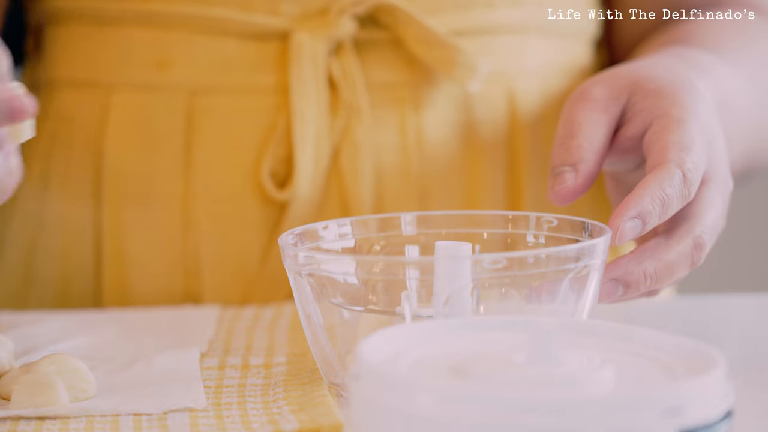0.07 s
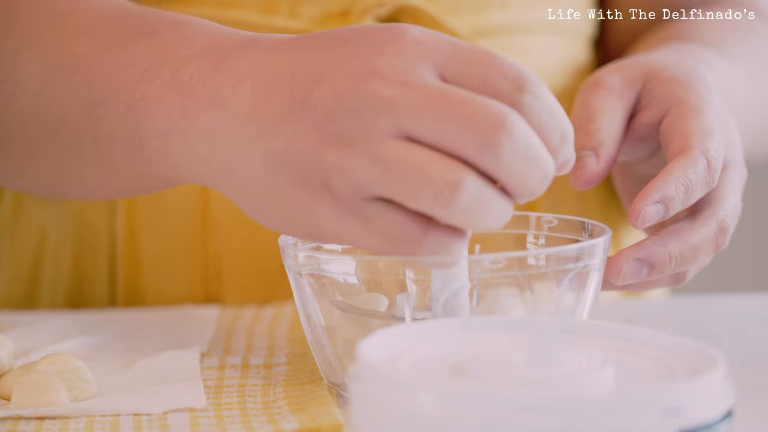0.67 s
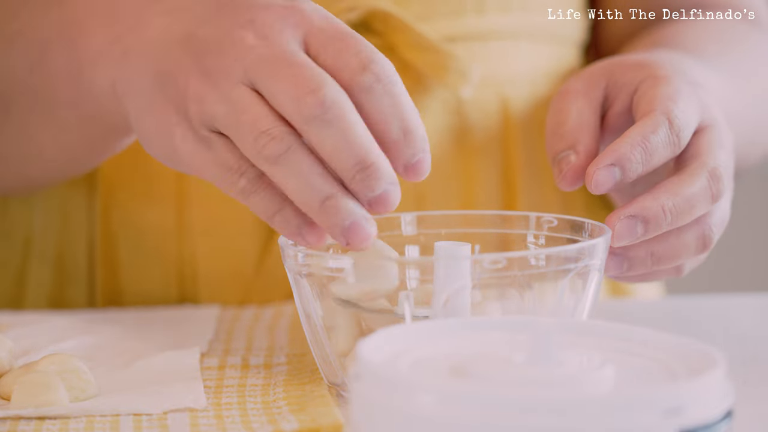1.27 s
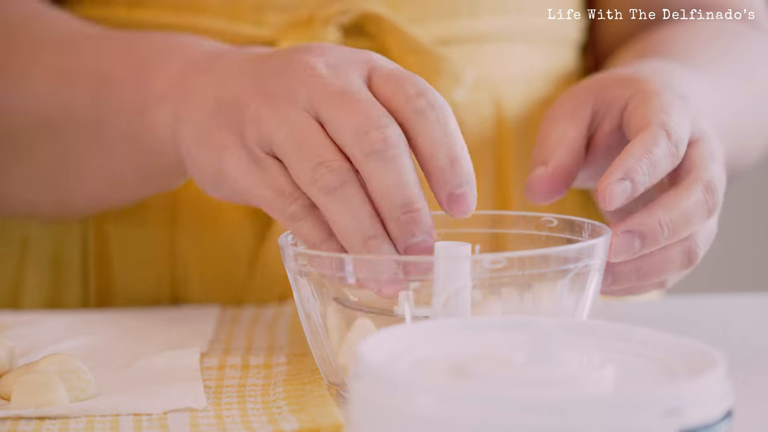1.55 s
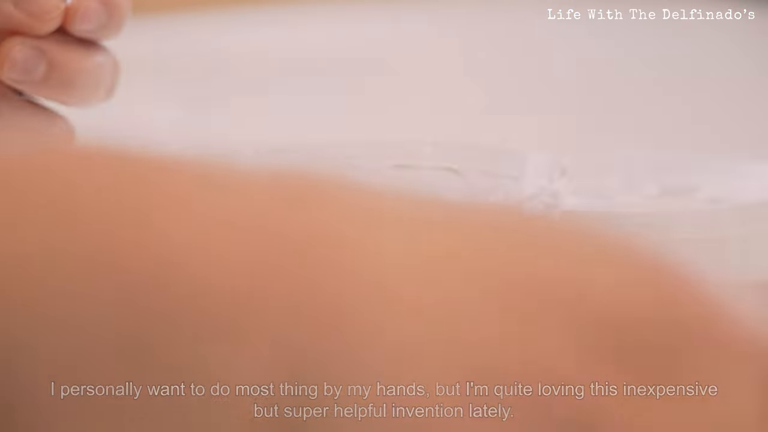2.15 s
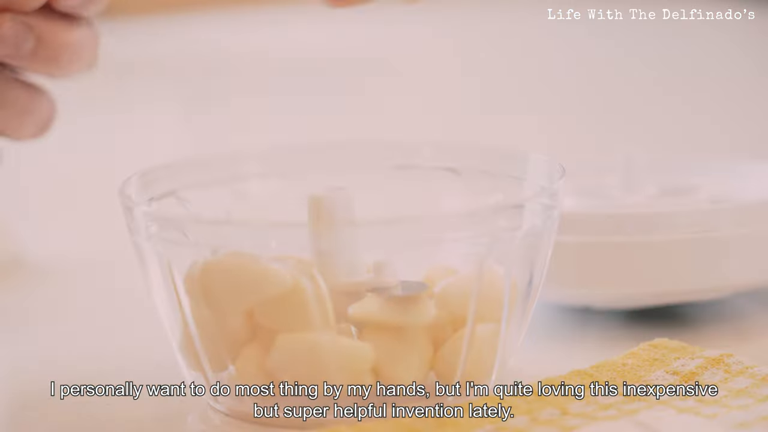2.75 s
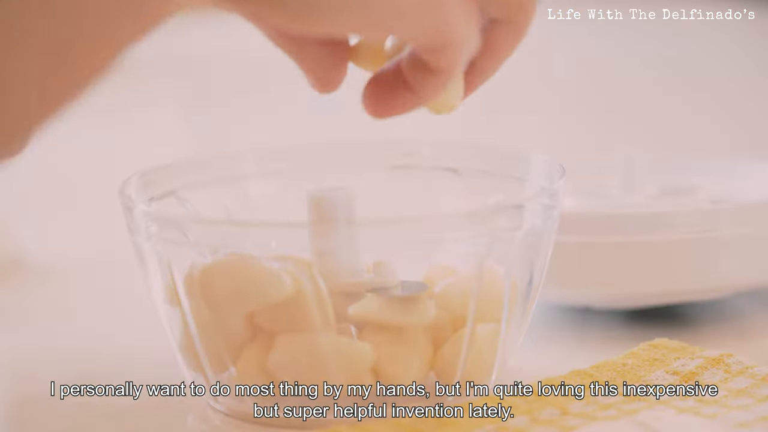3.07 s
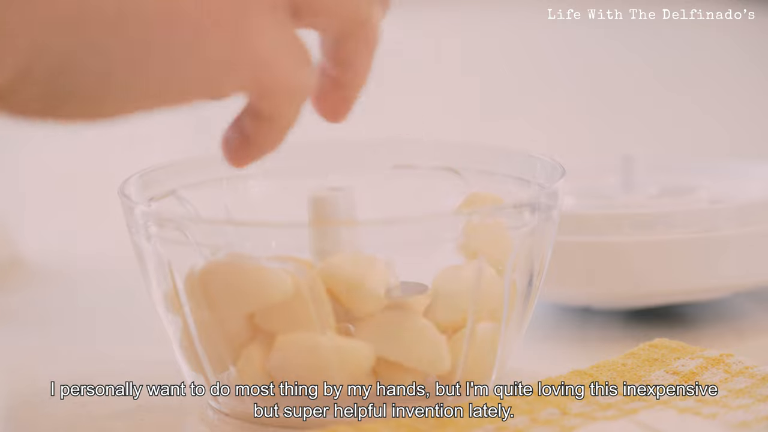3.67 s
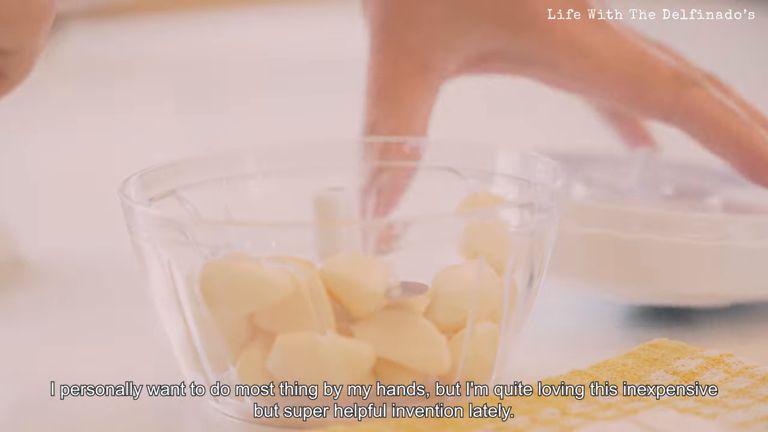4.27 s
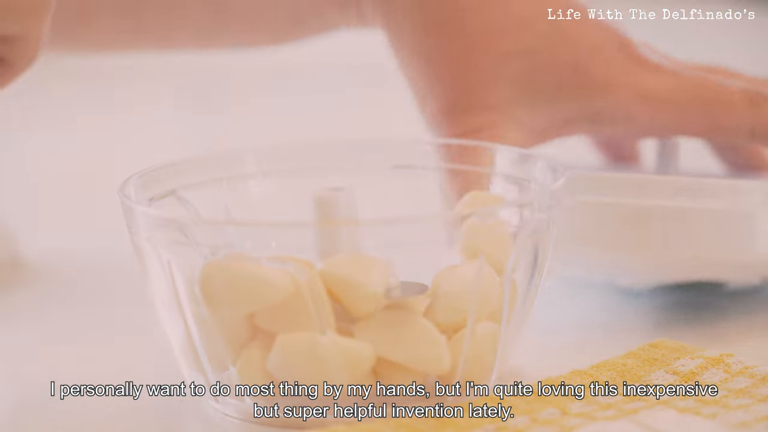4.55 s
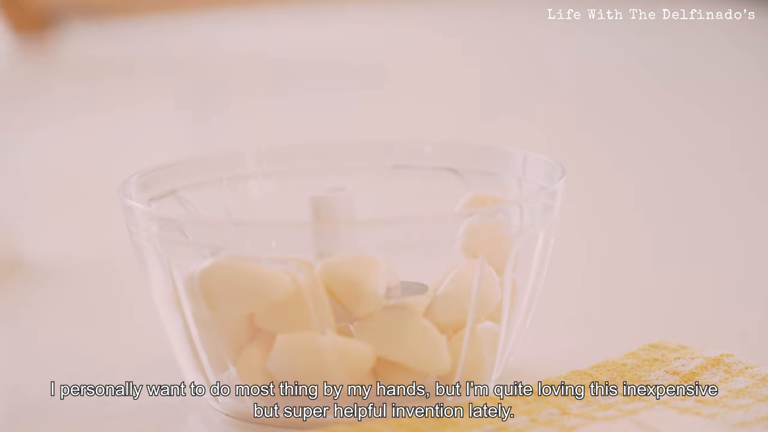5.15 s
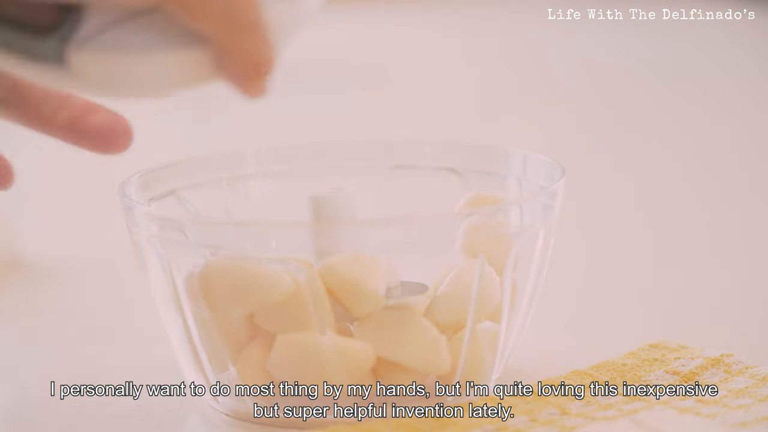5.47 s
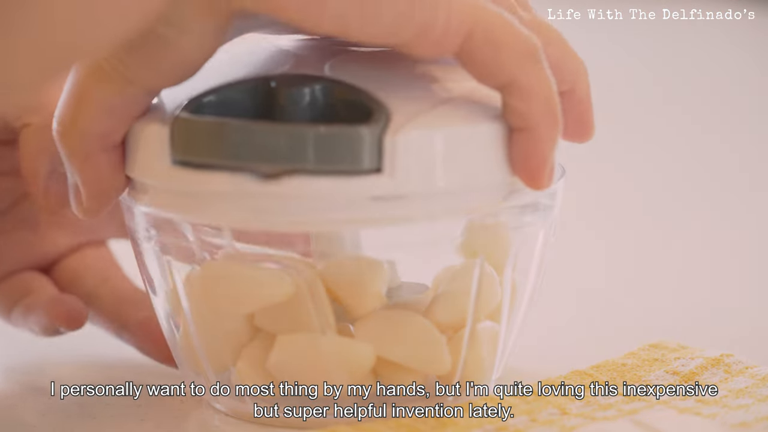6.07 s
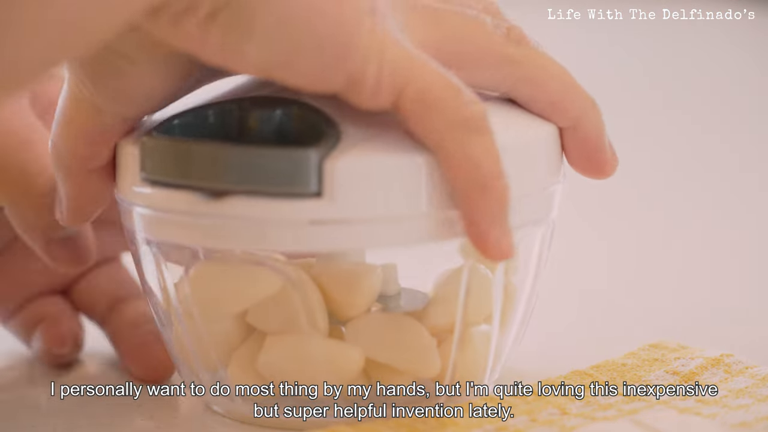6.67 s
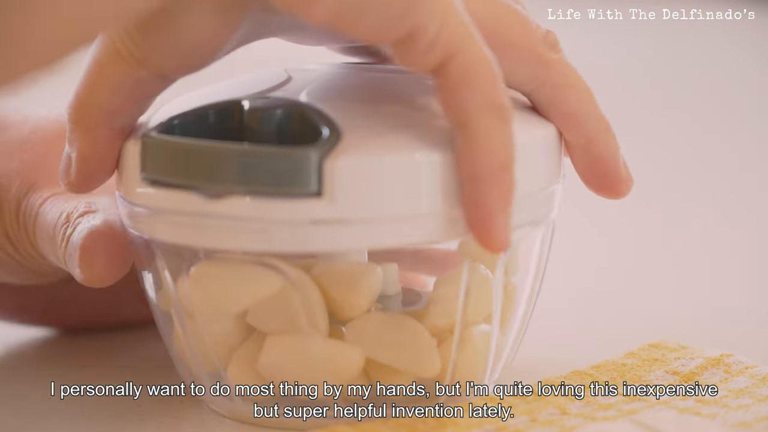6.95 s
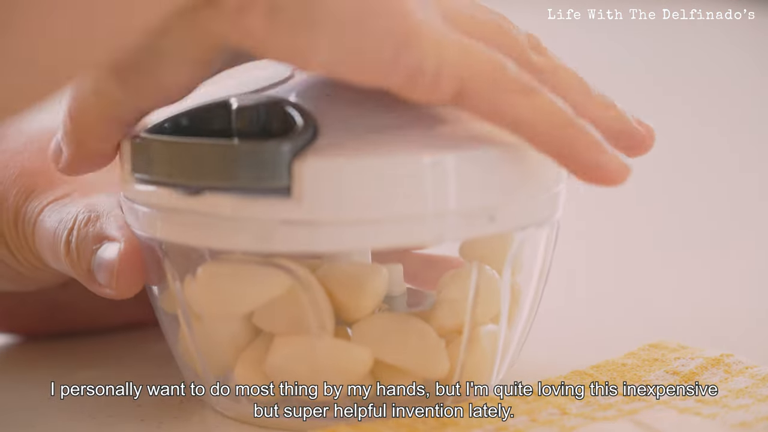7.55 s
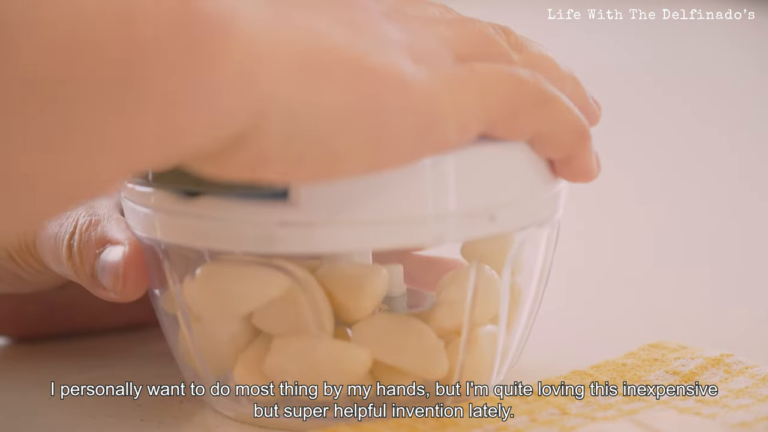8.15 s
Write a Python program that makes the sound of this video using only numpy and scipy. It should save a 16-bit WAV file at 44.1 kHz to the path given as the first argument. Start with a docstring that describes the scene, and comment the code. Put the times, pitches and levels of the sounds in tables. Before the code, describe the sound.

A faint hiss, appliance hum and low rumble run underneath, the rumble dropping at about 2 seconds. From 0.5 to 1.8 seconds, peeled garlic cloves tumble into a hard plastic chopper bowl in a quick, uneven run of hollow knocks, clacks and little rolls, each ringing briefly. A soft brush of fingers follows. Between 3 and 3.8 seconds a few more cloves drop in, quieter and duller. At 4 seconds the plastic lid clicks as it is picked up, with faint rubbing and light bumps until about 5.3. From 5.9 to 6.5 seconds the lid knocks onto the rim several times and settles. At about 7.4 it slides briefly and snaps shut, followed by a few small clicks until just after 8 seconds. Everything sounds close, with the slight, short echo of a small kitchen.

```python
"""Over a faint hum, hiss and rumble, peeled garlic cloves tumble into the plastic bowl of a hand chopper.
Fingers brush the plastic, and a few more cloves drop in. The lid clicks as it is picked up, knocks onto
the rim, settles and snaps shut. Each hit makes the plastic give a short hollow knock, a crack and a
brief ring, which echo in a small, hard kitchen."""
import sys
import numpy as np
from scipy import signal
from scipy.fft import rfft, irfft
from scipy.io import wavfile
from scipy.ndimage import uniform_filter1d

SR = 44100
rng = np.random.default_rng(int(sys.argv[2]) if len(sys.argv) > 2 else 0)


def materialize(psi):
    """Save the field psi as 16-bit PCM at rate SR to the path in sys.argv[1].

    A 1-D psi becomes a single channel; in a 2-D psi each row is a channel.
    """
    bounded = np.clip(np.atleast_2d(psi).T, -1, 1)
    quanta = np.round(bounded * 32767).astype(np.int16)
    wavfile.write(sys.argv[1], SR, quanta)


N = 366912
TIME = np.arange(N) / SR
HIT_TIME = TIME[:SR // 3]

# Levels in the tables are relative: the functions turn them up or down.
# The tone of the steady hiss. Each row: frequency in Hz, level in dB.
HISS_TONE = [(12, -32), (20, -4.5), (70, -0.5), (93, -16), (142, -6), (172, -21), (285, -9.5), (337, -15),
             (718, -14.5), (1370, -20), (2600, -22.5), (3630, -24), (8410, -24.5), (16000, -25.5)]
# The tone of the low rumble. Each row: frequency in Hz, level in dB.
RUMBLE_TONE = [(12, -32.5), (20, 9), (38, -6.5), (100, -1), (161, -5), (189, -1.5), (226, -14), (404, -23),
               (441, -15), (700, -18.5), (910, -58), (1540, -120)]
# Cloves landing in the bowl. Each row: start in seconds, knock level in dB, knock pitch in Hz,
# clack level in dB, tick level in dB.
CLOVE_HITS = [(0.478, -14.5, 570, -27, -46), (0.494, -17, 1110, -24, -41), (0.514, -15.5, 1000, -48, -51),
              (0.529, -27, 790, -34, -27), (0.546, -13, 820, -20, -30.5), (0.562, -15, 796, -38, -39),
              (0.593, -10, 1000, -15, -25), (0.616, -7, 820, -39, -37), (0.642, -6.5, 826, -26, -30.5),
              (0.688, -6, 790, -14, -19.5), (0.704, -7, 1170, -21, -24), (0.737, -4.5, 830, -25, -28.5),
              (0.748, -19, 824, -16, -31), (0.78, -3, 900, -23, -32), (0.792, -10.5, 970, -22, -29.5),
              (0.84, -6.5, 870, -34, -42), (0.884, -9.5, 796, -30, -35.5), (0.946, -6, 820, -33, -37),
              (0.959, -16, 770, -48, -49), (0.981, -15, 780, -48, -42), (1.022, -20, 900, -38, -33),
              (1.03, -9.5, 1010, -21, -31.5), (1.061, -6.5, 1060, -20, -32),
              (1.113, -3.5, 990, -16.5, -24.5), (1.115, -7, 510, -40, -38), (1.151, -13.5, 515, -18, -36),
              (1.18, -6.5, 1000, -28, -33), (1.223, -8.5, 750, -20.5, -32), (1.294, -10.5, 1110, -24, -41),
              (1.329, -11.5, 823, -19.5, -39), (1.39, -7.5, 810, -22.5, -29.5),
              (1.5, -9.5, 1084, -34, -37.5), (1.529, -17.5, 805, -36.5, -38.5),
              (1.65, -12.5, 950, -34, -39.5), (1.713, -11, 816, -41, -48), (1.755, -22, 830, -44, -48),
              (3.048, -17.5, 1280, -24, -34), (3.196, -20, 880, -38, -39), (3.292, -8.5, 1250, -19.5, -22),
              (3.346, -19.5, 820, -28, -45), (3.394, -20, 520, -43, -46), (3.428, -18, 880, -39, -43),
              (3.474, -20.5, 1250, -38, -35), (3.64, -24, 517, -43, -43), (3.668, -23, 1170, -26, -40.5),
              (3.752, -35.5, 600, -45, -55)]
# The notes the open bowl and its blades ring at. Each row: pitch in Hz, level in dB,
# seconds to fade by 60 dB.
BOWL_NOTES = [(503, -4, .33), (590, -12, .2), (788, -10, .25), (839, -9, .28), (943, -7, .35),
              (1013, -9, .25), (1089, -4, .28), (1158, -8, .25), (1310, -7, .33), (1427, -11, .28),
              (2030, -3, .15), (2135, 2, .17), (2330, -3, .17), (2610, -8, .45), (2713, -5, .5),
              (2931, -7, .35), (3920, 7, .04), (4570, 1, .07), (4830, -5, .12), (5530, -4, .1),
              (5900, -1, .12), (6250, 3, .06), (6740, 0, .12), (7150, -5, .1), (9400, -5, .07)]
# Garlic rolling after each drop. Each row: start in seconds, rolling time in seconds,
# then knock, clack and tick levels in dB.
CLOVE_TUMBLES = [(.48, 0.2, -15.5, -17, -37.5), (1.04, 0.18, -19, -19, -31),
                 (3.06, 0.11, -27.5, -39, -37.5), (3.32, 0.12, -32, -36, -37),
                 (3.679, 0.037, -41.5, -41, -36.5)]
# Fingers and lid sliding over plastic. Each row: start in seconds, seconds until it starts to fade,
# rub level in dB, hiss level in dB.
SLIDES = [(2.131, .2, -65, -44.5), (4.436, 0.21, -53, -48), (4.756, 0.043, -46, -57),
          (5.12, 0.23, -53, -47.5), (6.744, 0.09, -61, -50), (7.338, 0.12, -29.5, -32.5),
          (7.67, .08, -56, -46), (8.166, 0.1, -54, -68)]
# The gripped lid being picked up and latched. Each row reads as in CLOVE_HITS.
LID_CLICKS = [(3.975, -19, 1210, -20, -21), (4.079, -35, 930, -31.5, -34), (4.091, -39, 940, -28.5, -29),
              (7.276, -25, 1160, -33.5, -52), (7.32, -29, 1130, -35, -42), (7.387, -8, 1030, -13, -16.5),
              (7.533, -28, 851, -29, -44), (7.58, -33, 920, -24, -44), (7.593, -26.5, 900, -37, -30.5),
              (7.821, -27.5, 1310, -42, -54), (7.834, -28, 1130, -29.5, -38.5),
              (8.106, -41, 1140, -44, -64)]
# The notes the lid rings at. Each row reads as in BOWL_NOTES.
LID_NOTES = [(621, -6, .12), (694, -2, .24), (781, -1, .2), (880, -2, .2), (1024, -3, .18), (1595, 2, .2),
             (1810, 3, .17), (2035, 0, .22), (2659, 0, .25), (2890, 1, .22), (2935, 1, .22), (3890, 2, .07),
             (4511, -3, .1), (6260, -2, .08)]
# The lid bumping as it is moved, then hitting the rim. Each row reads as in CLOVE_HITS.
LID_HITS = [(4.805, -37, 634, -51, -53), (5.171, -30.5, 665, -38, -47), (5.216, -46, 670, -39, -51),
            (5.243, -34, 680, -40, -52), (5.947, -4, 687, -30, -42), (5.951, -7, 940, -18, -25),
            (6.025, -9.5, 840, -29, -51), (6.085, -4.5, 760, -17, -23), (6.155, -12, 750, -28, -41),
            (6.228, -4.5, 657, -15.5, -32.5), (6.269, -11.5, 730, -15.5, -35),
            (6.388, -8, 700, -21.5, -38.5), (6.468, -23, 700, -20.5, -44), (6.484, -35, 895, -29, -40),
            (6.514, -13, 770, -22, -33.5)]
# First echoes off the worktop and wall. Each row: delay in seconds, left strength, right strength.
FIRST_ECHOES = [(.0042, -.05, 0.25), (.0063, 0.21, 0.43), (.0135, .15, .22)]
# The tone of the kitchen's echo. Each row: frequency in Hz, level in dB.
ECHO_TONE = [(100, 3.5), (250, -7.5), (450, 4), (700, -2), (1100, 1), (1600, -2.5), (3000, -1),
             (6000, -3.5), (10000, -1), (16000, 1)]
# How long the echo lasts. Each row: frequency in Hz, seconds to fade by 60 dB.
ECHO_FADE = [(150, 0.47), (500, 0.42), (1200, 0.36), (3000, 0.4), (7000, 0.5), (15000, 0.18)]
# How wide the room sounds. Each row: frequency in Hz, level in dB of what differs between
# left and right against what they share.
ROOM_WIDTH = [(40, -30), (130, -19), (430, -18), (600, -8), (1100, -8), (2200, -1.5), (5000, 1.5),
              (15000, 2)]

HISS_DB, RUMBLE_DB, HUM_DB, HUM_HZ = -45.5, -43.5, -52.5, 61.2
BOWL_FILLS_S = (1.0, 3.7)  # over this time the growing heap of garlic muffles the bowl
LID_SETTLES_S = (6.03, 6.39)  # over this time the rim muffles the lid
KNOCK_FADE_DB_PER_S, SHARP_FADE_DB_PER_S, SETTLE_S = 74, 90, .6  # sharp sounds die before dull ones
SLIDE_RISE_S, SLIDE_FADE_S = 0.041, 0.068
# Over SHIFT_S the rumble drops and the bowl's sound moves from slightly right to the centre.
SHIFT_S, RUMBLE_DROP_DB, BOWL_LEFT_DB = (2.12, 2.24), 10, -2.5


def gain(db):
    """Turn decibels into a number to multiply by."""
    return 10 ** (np.asarray(db) / 20)


def value_at(points, hz):
    """Read between rows of frequency and value, giving each octave equal room."""
    row_hz, value = np.transpose(points)
    return np.interp(np.log(np.maximum(hz, 1)), np.log(row_hz), value)


def ramp(s, start_s, end_s):
    """Rise evenly from 0 to 1 between two times."""
    return np.clip((s - start_s) / max(end_s - start_s, 1e-3), 0, 1)


def level(x, db):
    """Set a sound's average (rms) level."""
    return x * gain(db) / np.sqrt(np.mean(x ** 2))


def burst(x, db):
    """Give a short sound as much energy as 10 ms of steady sound at this level."""
    return x * gain(db) / np.sqrt(np.sum(x ** 2) / (SR / 100))


def band(x, lo_hz, hi_hz, order=2):
    """Keep the sound between two frequencies; a higher order cuts more sharply."""
    edges = [lo_hz, min(hi_hz, SR / 2 - 1000)]
    return signal.sosfilt(signal.butter(order, edges, "band", fs=SR, output="sos"), x)


def add(track, s, sound):
    """Mix a sound in, starting at s seconds."""
    start = max(int(s * SR), 0)
    part = sound[:max(N - start, 0)]
    track[start:start + len(part)] += part


def place(x, left_db):
    """Lean a sound left (or right, if negative), leaving its bass in the middle."""
    upper = band(x, 580, 20000, order=1)
    return x + upper * (gain(np.array([[1], [-1]]) * left_db / 2) - 1)


def room_noise(tone, size):
    """Stereo noise: alike on both sides in the bass, different in the treble."""
    hz = np.fft.rfftfreq(size, 1 / SR)
    shared, side = rfft(rng.standard_normal((2, size))) * gain(value_at(tone, hz))
    side = side * gain(value_at(ROOM_WIDTH, hz))
    return irfft(np.array([shared + side, shared - side]), size)


def background(shift):
    """Steady hiss, a wavering appliance hum and a rumble that drops as shift goes from 0 to 1."""
    waver = level(band(rng.standard_normal(N), 0.62, 4.2), -1.5)
    hum = level(np.sin(2 * np.pi * HUM_HZ * TIME) * (1 + waver), HUM_DB)
    rumble = level(room_noise(RUMBLE_TONE, N), RUMBLE_DB) * gain(-RUMBLE_DROP_DB * shift)
    return level(room_noise(HISS_TONE, N), HISS_DB) + hum + rumble


def knock(hz, cycles):
    """The plastic wall swings harder while it is pushed, then quickly stops."""
    turns = hz * HIT_TIME
    return np.sin(2 * np.pi * turns) * turns * np.exp(-np.minimum(turns / cycles, 50))


def crack(lo_hz, hi_hz, decay_s, order=2):
    """Many crowded notes of the plastic die so fast that they sound like noise."""
    t = HIT_TIME[:SR // 16]
    spectrum = rfft(rng.standard_normal(len(t)) * np.exp(-t / decay_s))
    # so many overlap that the peaks and gaps are shallow
    spectrum = spectrum / np.sqrt(abs(spectrum) + 1e-12)
    sound = irfft(spectrum, len(t)) * np.exp(-t / (2 * decay_s))
    return np.pad(band(sound, lo_hz, hi_hz, order), (0, len(HIT_TIME) - len(t)))


def ring(notes, hit_tone):
    """The plastic rings on; each note's strength depends on the hit's tone and where it lands."""
    hz, db, fade_s = np.transpose(notes)
    spot, detune = rng.standard_normal((2, len(hz)))
    # a note is weak when struck at a spot where it barely moves
    strength = gain(db + value_at(hit_tone, hz)) * np.tanh(2 * spot)
    swing = np.sin(2 * np.pi * np.outer(hz * (1 + .003 * detune), HIT_TIME))
    fade = np.exp(-np.log(1000) * np.outer(1 / fade_s, HIT_TIME))
    return strength @ (swing * fade)


def hits(table, notes, muffle_s, *, knock_db, free_cycles, muffled_cycles,
         thud_db, thud_rise_db, thud_follow, thud_lo_hz, clack_db, clack_hz, crack_s,
         tick_db, tick_top_hz, ring_db, ring_loss_db, ring_edge_db):
    """Each hit makes a hollow knock, a thud through the worktop, a clack, a hard tick and a ring."""
    out = np.zeros(N)
    for s, body, hz, clack, tick in table:
        # plastic with weight on it rings less and passes more of the hit to the worktop
        muffled = ramp(s, *muffle_s)
        thud = thud_follow * body + thud_rise_db * muffled
        cycles = free_cycles + (muffled_cycles - free_cycles) * muffled
        sound = burst(knock(hz, cycles), body + knock_db)
        sound += burst(crack(thud_lo_hz, 790, decay_s=0.0032), thud + thud_db)
        sound += burst(crack(*clack_hz, crack_s, order=3), clack + clack_db)
        sound += burst(crack(3300, tick_top_hz, crack_s, order=1), tick + tick_db)
        hit_tone = [(1200, body + knock_db), (1900, clack), (2750, clack + ring_edge_db), (4500, tick)]
        sound += gain(ring_db - ring_loss_db * muffled) * ring(notes, hit_tone)
        add(out, s, sound)
    return out


def cloves_landing():
    """Cloves strike the bowl, which rings less as it fills."""
    return hits(CLOVE_HITS, BOWL_NOTES, BOWL_FILLS_S,
                knock_db=-10, free_cycles=0.79, muffled_cycles=0.94,
                thud_db=-28.5, thud_rise_db=1.5, thud_follow=0.29, thud_lo_hz=239,
                clack_db=-3, clack_hz=(1400, 2730), crack_s=0.012, tick_db=-2, tick_top_hz=5970,
                ring_db=-9, ring_loss_db=7, ring_edge_db=-2)


def cloves_rolling(bumps_per_s=60, knock_db=-10.5, clack_db=-11.5, tick_db=-14, scatter_db=3.5):
    """Cloves roll over each other in many small bumps that fade as they settle."""
    out = np.zeros(N)
    for s, rolling_s, body, clack, tick in CLOVE_TUMBLES:
        ages = np.arange(0, rolling_s + SETTLE_S, 1 / bumps_per_s)
        for age, (late, size, pitch) in zip(ages, rng.standard_normal((len(ages), 3))):
            settling_s = max(age - rolling_s, 0)
            dull = scatter_db * size - KNOCK_FADE_DB_PER_S * settling_s
            sharp = scatter_db * size - SHARP_FADE_DB_PER_S * settling_s
            sound = burst(knock(950 * np.exp(.3 * pitch), cycles=0.82), body + dull + knock_db)
            sound += burst(crack(2030, 2080, decay_s=0.0016), clack + sharp + clack_db)
            sound += burst(crack(2500, 15500, decay_s=0.0096, order=1), tick + sharp + tick_db)
            add(out, s + age + abs(late) / bumps_per_s / 2, sound)
    return out


def fingers_sliding(rub_db=-6.5, hiss_db=-6, grain_db=5):
    """Skin slips on plastic in tiny, uneven catches that swell and fade with each slide."""
    out = np.zeros(N)
    catches = rng.standard_normal(N)
    catches *= gain(grain_db * np.repeat(rng.standard_normal(N // 128 + 1), 128)[:N])
    rub = level(band(catches, 330, 2230), rub_db)
    hiss = level(band(catches, 1200, 7500, order=1), hiss_db)
    for s, length_s, low_db, high_db in SLIDES:
        rise = ramp(TIME, s, s + SLIDE_RISE_S)
        fade = np.exp(-np.maximum(TIME - s - length_s, 0) / SLIDE_FADE_S)
        out += rise * fade * (rub * gain(low_db) + hiss * gain(high_db))
    return out


def lid_clicking():
    """The gripped lid gives dry clicks as it is picked up and later snapped shut."""
    return hits(LID_CLICKS, LID_NOTES, LID_SETTLES_S,
                knock_db=-10, free_cycles=0.73, muffled_cycles=0.29,
                thud_db=-25, thud_rise_db=7, thud_follow=1.11, thud_lo_hz=173,
                clack_db=-8, clack_hz=(1320, 3430), crack_s=0.0027, tick_db=-6.5, tick_top_hz=7700,
                ring_db=-20, ring_loss_db=17, ring_edge_db=-7)


def lid_knocking():
    """The loose lid knocks about, ringing less and thudding more as it settles on the rim."""
    return hits(LID_HITS, LID_NOTES, LID_SETTLES_S,
                knock_db=-11, free_cycles=1.0, muffled_cycles=0.44,
                thud_db=-40.5, thud_rise_db=14.5, thud_follow=0.24, thud_lo_hz=118,
                clack_db=-5, clack_hz=(970, 2790), crack_s=0.0052, tick_db=-0.5, tick_top_hz=6400,
                ring_db=-15.5, ring_loss_db=13, ring_edge_db=-2.5)


def kitchen(dry, echo_db=-29.5, build_s=0.0022):
    """Hard surfaces add a few quick echoes, then a wash of echo whose highest treble dies first."""
    t = TIME[:SR * 3 // 4]
    hz, frame_s, frames = signal.stft(room_noise(ECHO_TONE, len(t)), SR, nperseg=256)
    fade = np.exp(-np.log(1000) * frame_s / value_at(ECHO_FADE, hz)[:, None])
    spectrum = rfft(signal.istft(frames * fade, SR)[1][:, :len(t)])
    # the room's own notes overlap, so none stands far above its neighbours
    power = np.mean(abs(spectrum) ** 2, axis=0)
    even_out = np.sqrt(uniform_filter1d(power, size=220) / uniform_filter1d(power, size=16))
    swell = 1 - np.exp(-(t / build_s) ** 2)
    end_fade = np.minimum(10 * (t[-1] - t), 1)
    response = irfft(spectrum * even_out, len(t)) * swell * gain(echo_db) * end_fade
    near = np.zeros_like(response)
    for delay_s, left, right in FIRST_ECHOES:
        near[:, int(delay_s * SR)] += left, right
    response += band(near, 650, 12000)  # small surfaces throw back little bass
    response[:, 0] += 1  # the direct sound
    return signal.fftconvolve(dry, response, axes=1)[:, :N]


def scene():
    """Garlic, lid and fingers sound in the kitchen, over the background."""
    shift = ramp(TIME, *SHIFT_S)
    garlic = cloves_landing() + cloves_rolling()
    lid = lid_knocking()
    clicks = lid_clicking()
    fingers = fingers_sliding()
    dry = place(garlic, left_db=BOWL_LEFT_DB * (1 - shift))
    dry += place(lid + fingers, left_db=0.5) + clicks
    return kitchen(dry) + background(shift)


def record(dry):
    """Round off the loudest peaks and cut the treble above 16000 Hz."""
    rounded = np.tanh(0.56 * dry) / 0.64
    return signal.sosfilt(signal.ellip(10, .2, 70, 16000, fs=SR, output="sos"), rounded)


dry = scene()
out = record(dry)
materialize(out)
```